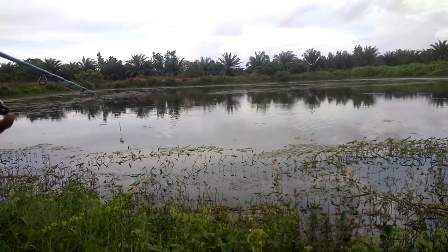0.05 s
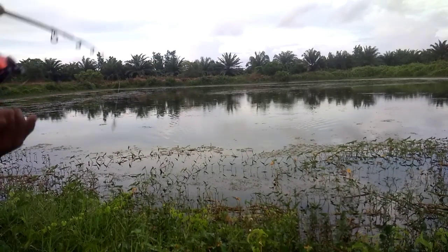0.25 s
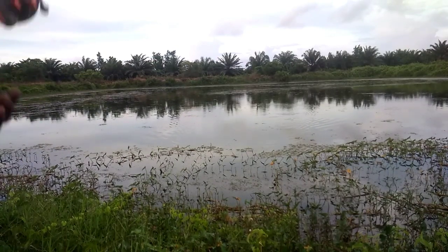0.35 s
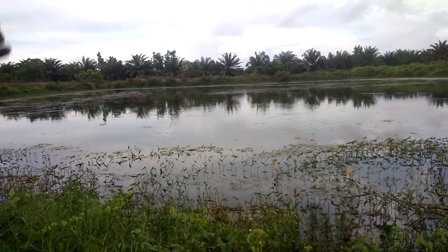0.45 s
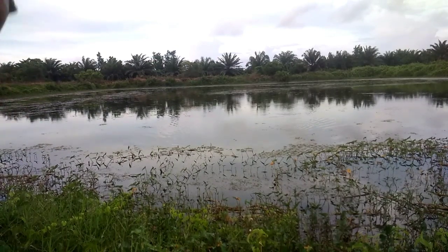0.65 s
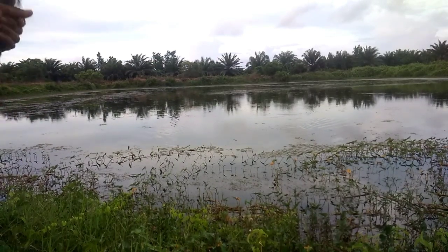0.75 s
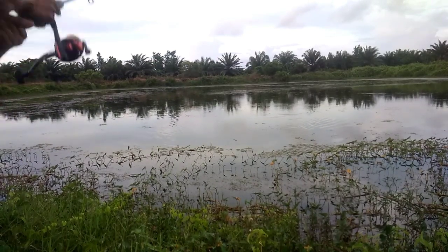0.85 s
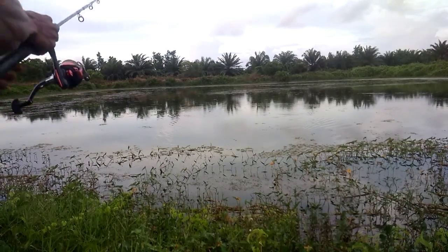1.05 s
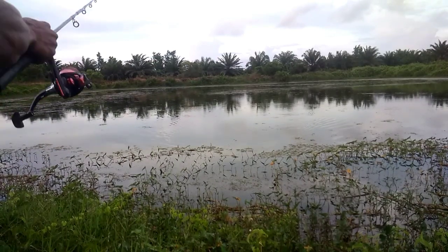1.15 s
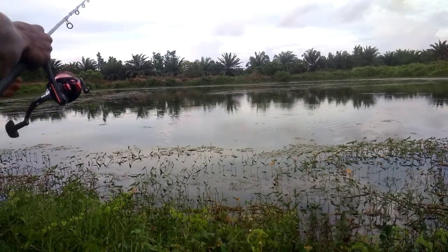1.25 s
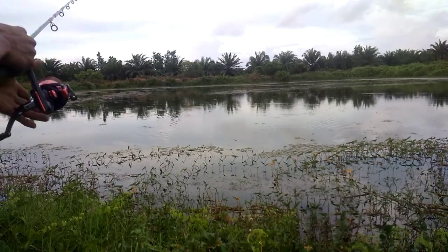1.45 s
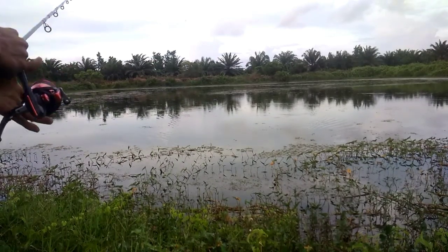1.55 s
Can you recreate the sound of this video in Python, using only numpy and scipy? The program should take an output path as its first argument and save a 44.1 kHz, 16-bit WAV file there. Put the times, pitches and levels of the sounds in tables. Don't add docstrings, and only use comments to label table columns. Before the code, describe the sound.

Fishing cast by a pond with metallic bail snap, whistling rod swish and line hissing off the spool

```python
import sys
import numpy as np
from scipy import signal
from scipy.fft import rfft, irfft, next_fast_len
from scipy.io import wavfile
from scipy.ndimage import uniform_filter1d, map_coordinates

SR = 44100
rng = np.random.default_rng(int(sys.argv[2]) if len(sys.argv) > 2 else 0)


def wrap_up_sound(samples):
    columns = np.atleast_2d(samples).T
    tamed = np.clip(columns, -1, 1)
    steps = np.round(tamed * 32767).astype(np.int16)
    wavfile.write(sys.argv[1], SR, steps)


def magnitude_from_level(level_db):
    exponent = np.asarray(level_db, float) / 20
    return 10 ** exponent


N = 70560
t = np.arange(N) / SR


def unit(x):
    return x / np.sqrt(np.mean(x ** 2) + 1e-20)


def curves(rows):
    s, *cols = np.transpose(rows)
    return [np.interp(t, s, c) for c in cols]


def wobble(rate):
    return map_coordinates(rng.standard_normal(int(N * rate / SR) + 4), [t * rate])


def coloured(x, points):
    f, db = np.transpose(points)
    m = next_fast_len(N + 8192)
    hz = np.fft.rfftfreq(m, 1 / SR)
    gain = magnitude_from_level(np.interp(np.log(hz + 1), np.log(f + 1), db))
    return unit(irfft(rfft(x, m) * gain, m)[:N])


def noise(points):
    return coloured(rng.standard_normal(N), [(1, -120)] + list(points) + [(16500, -120)])


def dying(s, t60, attack):
    u = np.clip(t - s, 0, None)
    return magnitude_from_level(-60 * u / t60) * (1 - np.exp(-u / attack))


def ring(s, hz):
    return np.sin(2 * np.pi * hz * (t - s))


def glide(hz):
    return np.sin(2 * np.pi * np.cumsum(hz) / SR)


def step(s):
    cut_s = 0.0017
    return 1 / (1 + np.exp(np.clip((t - s) / cut_s, -50, 50)))


# time in seconds, level in dB.
GUSTS = [(0.0, -52), (0.12, -51.5), (0.27, -43), (0.36, -51), (0.566, -51.5), (0.672, -48), (0.828, -52),
         (1.016, -45.5), (1.148, -51.5), (1.304, -47.5), (1.496, -47.5), (1.6, -44.5)]
# frequency in Hz, level in dB.
RUMBLE = [(12, -28), (20, 9.5), (162, -6), (193, -18.5), (282, -13.5), (400, -22), (520, -37), (880, -120)]


def wind():
    return magnitude_from_level(curves(GUSTS)[0] - 3 + 2.8 * wobble(13.55)) * noise(RUMBLE)


# time in seconds, level in dB.
GATE = [(0, -53), (.034, -48.5), (.042, -39), (.076, -45), (.09, -54.5), (.215, -50), (.235, -31),
        (.32, -35), (.34, -43.5), (.42, -53), (.472, -48), (.488, -30.5), (.56, -37), (.615, -48.5),
        (.82, -50.5), (.87, -27.5), (.95, -36.5), (1.6, -51.5)]
# frequency in Hz, level in dB.
HISS = [(120, -61), (200, -1.5), (529, -6), (735, -4.5), (1200, -10), (1270, -10), (1690, -12),
        (8500, -38.5), (11000, -55), (18700, -120)]


def far_hiss():
    floor_db, follows_gate, sway_db = -68.5, 0.21, 1.2
    gate_db = curves(GATE)[0]
    lift_db = follows_gate * (gate_db - gate_db.min())
    return magnitude_from_level(floor_db + lift_db + sway_db * wobble(14.7)) * noise(HISS)


def far_bird():
    start_s, length_s, start_hz, sag_hz, level_db = 0.735, 0.089, 1316, 40, -62.5
    u = np.clip((t - start_s) / length_s, 0, 1)
    return magnitude_from_level(level_db) * np.sin(np.pi * u) * glide(start_hz - sag_hz * u)


# frequency in Hz, level in dB.
WING = [(7500, -25.5), (8700, -20), (9300, -2), (9850, -1), (10500, -8), (11300, -19), (12300, -51.5)]


def steady_insect():
    strokes_per_s, first_s = 92.8, 0.0027
    high_hz, low_hz, roughness = 10750, 9160, 0.48
    scatter_db, blur_db = 1.2, -8
    turn = ((t - first_s) * strokes_per_s + 0.031 * wobble(27)) % 1
    hz = high_hz + (low_hz - high_hz) * turn + 250 * wobble(700)
    stroke = np.sin(np.pi * turn) ** 0.5 * (1 + roughness * wobble(900))
    stroke = stroke * magnitude_from_level(scatter_db * wobble(59.46))
    song = coloured(stroke * glide(hz), WING) + magnitude_from_level(blur_db) * noise(WING)
    return magnitude_from_level(curves(GATE)[0]) * unit(song)


# end in seconds, level in dB, left against right in dB.
CHIRPS = [
    (0.933, -33, -16),
    (1.044, -31.5, -16.5),
    (1.144, -26.5, -16),
    (1.249, -35.5, -42),
    (1.352, -34, -44),
    (1.458, -35.5, -38.5),
    (1.576, -46, -27.5),
    (1.62, -55.5, -9.5),
]


def chirping_insect():
    strokes_per_s, first_s = 140, 0.0031
    centre_hz, fall_hz = 9944, 890
    roughness, scatter_db = 0.3, 1.2
    swell_db_per_s, loud_s, quiet_db, length_s = 66, 0.044, -6.5, 0.11
    turn = ((t - first_s) * strokes_per_s + 0.028 * wobble(24.98)) % 1
    stroke = np.sin(np.pi * turn ** 0.49) ** 2 * magnitude_from_level(scatter_db * wobble(69.94))
    stroke = stroke * (1 + roughness * wobble(870))
    hz = centre_hz + fall_hz * (0.5 - turn) + 120 * wobble(300)
    buzz = coloured(stroke * glide(hz), WING)
    swells = 0
    for end_s, db, left_db in CHIRPS:
        swell = magnitude_from_level(-swell_db_per_s * np.abs(t - end_s) + quiet_db * step(end_s - loud_s))
        swell = swell * step(end_s) * (1 - step(end_s - length_s))
        swells = swells + magnitude_from_level([[db + left_db], [db]]) * swell
    return swells * buzz


# start in seconds, level in dB, frequency in Hz, 60 dB decay in seconds.
JOLTS = [
    (0.221, -28.5, 36, 0.12),
    (0.251, -21, 38, 0.11),
    (.938, -22.5, -19.5, .1),
    (.957, -17.5, 42.5, 0.13),
    (0.959, -29.5, 117.5, 0.096),
    (1.172, -37, 47.5, 0.24),
    (.33, -38.5, 55, 0.4),
]


def jolts():
    return sum(magnitude_from_level(db) * dying(s, t60, 0.0016) * ring(s, hz) for s, db, hz, t60 in JOLTS)


# time in seconds, level in dB.
SWISH = [(0.8, -85), (0.818, -74.5), (0.88, -39.5), (0.902, -34.5), (0.926, -44), (0.994, -63), (1.05, -52),
         (1.284, -98.5), (1.3, -104)]
# frequency in Hz, level in dB per Hz.
AIR = [(120, -73), (200, -18.5), (717, -11), (1010, -17), (1220, -16), (4290, -15), (6170, -16),
       (10100, -7), (15600, -20.5)]
# time in seconds, level in dB, pitch in Hz.
WHISTLE = [(.805, -70, 2750), (.825, -61.5, 4090), (.855, -44.5, 6630), (.875, -70, 8100)]


def cast():
    on = np.interp(t, [0.79, 0.81, 1.3, 1.45], [0, 1, 1, 0])
    swish = on * magnitude_from_level(curves(SWISH)[0] + 7.0 + 2.0 * wobble(250)) * noise(AIR)
    db, hz = curves(WHISTLE)
    sounding = (t > WHISTLE[0][0]) * (t < WHISTLE[-1][0])
    whistle = magnitude_from_level(db) * wobble(1500) * glide(hz) * sounding
    return swish + whistle


# frequency in Hz, level in dB.
RUN = [(2500, -26.5), (5000, -29), (7500, -15.5), (9900, -4), (11000, 5), (12200, -6), (12400, -56)]


def line_run():
    start_s, level_db, t60_s, rise_s = 0.864, -28.5, 1.09, 0.061
    flutter = magnitude_from_level(level_db + 1.18 * wobble(11.66) + 2.2 * wobble(300))
    return flutter * dying(start_s, t60_s, rise_s) * noise(RUN)


# start in seconds, level in dB, 60 dB decay in seconds, rise in seconds.
RATTLE = [
    (0.22, -20.5, 0.095, 0.009),
    (0.49, -36.5, 0.054, 0.001),
    (0.607, -48, 0.45, 0.096),
    (0.024, -58.5, 0.17, 0.024),
    (.25, -55, 0.18, 0.013),
]


def rattle():
    colour = [(700, -43), (1800, 1), (2700, -5.5), (4000, -2), (7500, 6), (10000, -1.5), (15500, -16.5)]
    grains = magnitude_from_level(2.4 * wobble(500)) * noise(colour)
    return grains * sum(magnitude_from_level(db) * dying(s, t60, rise) for s, db, t60, rise in RATTLE)


# start in seconds, level in dB, ring in Hz,
# 60 dB decay in seconds, share of bright crack (ratio).
TICKS = [(0.043, -46.5, 7130, 0.011, 0.59), (0.2232, -28, 3604, 0.045, 0.17),
         (0.228, -28.5, 1037, 0.016, .2), (0.229, -27, 5070, 0.03, .3), (0.2256, -19, 9950, 0.036, 1.9),
         (0.2277, -22.5, 3440, 0.025, 2.4), (0.231, -20.5, 7040, 0.035, 1.33),
         (0.2298, -19, 15000, 0.033, 1.43), (0.2306, -27.5, 1655, 0.038, 0.44),
         (0.235, -7.5, 15400, 0.016, 0.24), (0.2402, -21.5, 10800, 0.013, 1.5),
         (0.2469, -21, 10500, 0.011, 0.97), (.480, -21.5, 3710, 0.011, 0.24),
         (0.4792, -26.5, 4380, 0.0052, 0.25), (.4855, -33, 3600, 0.0086, .4),
         (0.488, -38.5, 1958, 0.05, 0.33), (.490, -46.5, 1030, 0.019, .3), (0.496, -40, 5200, 0.014, 0.37),
         (0.6917, -38, 3780, 0.004, 0.27), (0.874, -17.5, 10540, 0.041, 0.27),
         (0.902, -27, 4400, 0.013, 0.68), (.957, -44.5, 2090, 0.051, .3), (1.055, -47.5, 2014, 0.047, 0.58)]


def reel_ticks():
    bright = noise([(600, -34), (1200, -15.5), (2700, -8), (3600, -9.5), (7000, -17.5), (10000, 8.5),
                    (13000, -6.5), (15500, -3)])
    out = 0
    for s, db, hz, t60, crack in TICKS:
        mode = dying(s, t60, 0.00023) * ring(s, hz)
        out = out + magnitude_from_level(db) * (mode + crack * bright * dying(s, 0.011, 0.0001))
    return out


def scene():
    left_db, copy_db, mix_db, run_left_db = -16, -22.5, 5.5, -20
    near = wind() + far_hiss() + far_bird() + steady_insect()
    near = near + jolts() + cast() + rattle() + reel_ticks()
    left = magnitude_from_level(left_db) * (near + magnitude_from_level(copy_db) * np.roll(near, shift=331))
    run = magnitude_from_level([[run_left_db], [0]]) * line_run()
    return magnitude_from_level(mix_db) * (np.array([left, near]) + chirping_insect() + run)


def low_pass(x):
    return signal.sosfilt(signal.butter(12, 15800, fs=SR, output="sos"), x)


def record(dry):
    edge_hz, top_hz, open_db, steepness = 12300, 15800, -50, 3
    hz, z = np.fft.rfftfreq(N, 1 / SR), rfft(dry)
    low = irfft(z * (hz < edge_hz), N)
    top = irfft(z * (hz >= edge_hz) * (hz < top_hz), N)
    power = np.abs(uniform_filter1d(top[1] ** 2, size=700)) + 1e-20
    open_share = 1 / (1 + (magnitude_from_level(open_db) ** 2 / power) ** steepness)
    return low_pass(np.clip(low + open_share * top, -1, 1))


dry = scene()
out = record(dry)
wrap_up_sound(out)
```